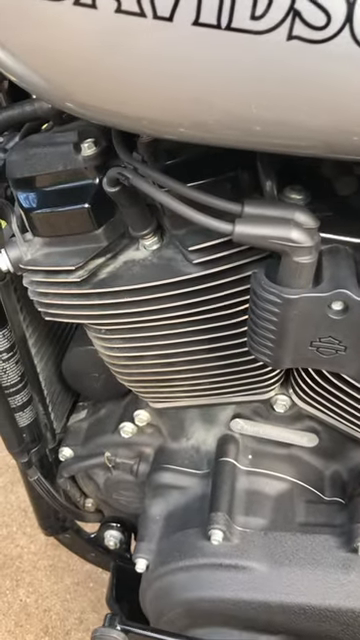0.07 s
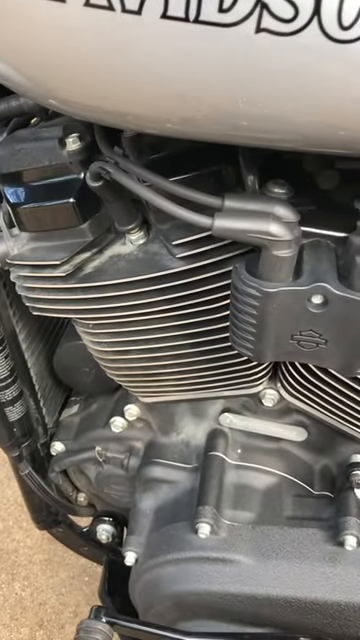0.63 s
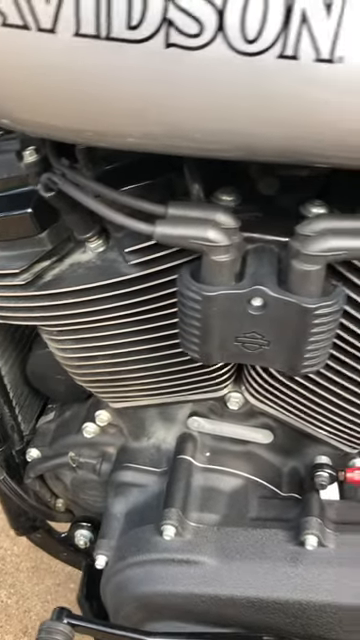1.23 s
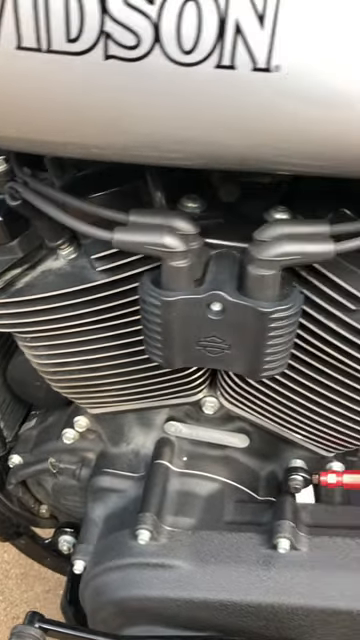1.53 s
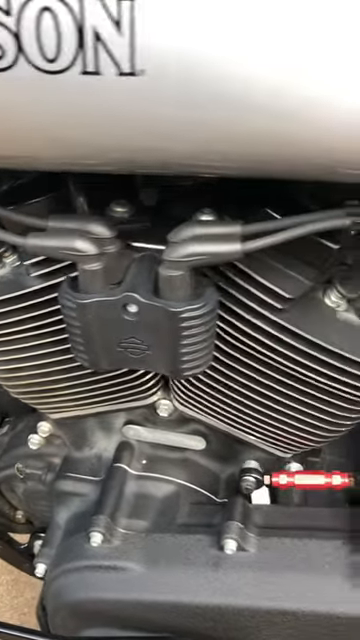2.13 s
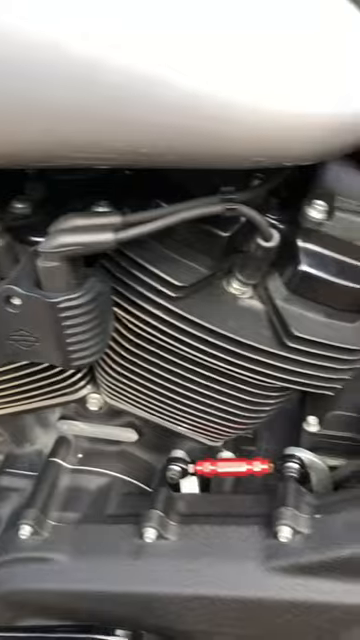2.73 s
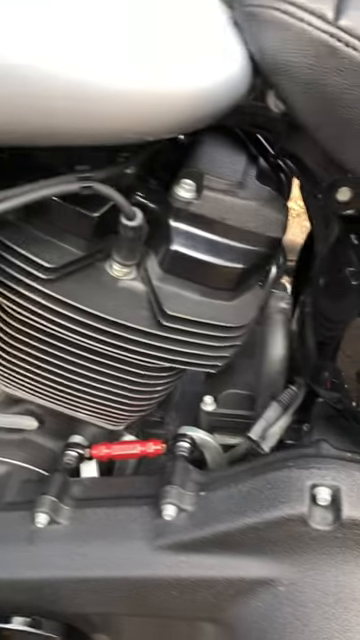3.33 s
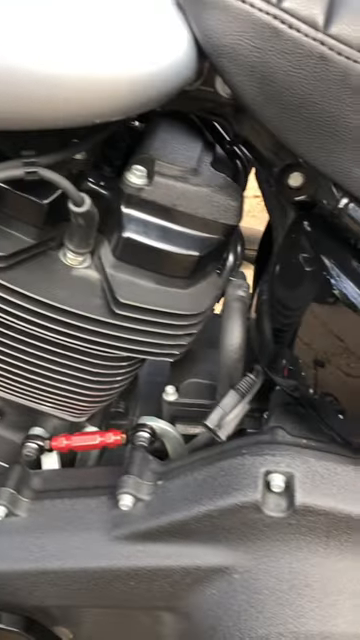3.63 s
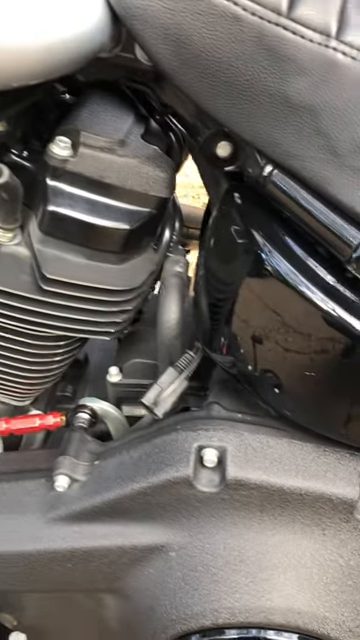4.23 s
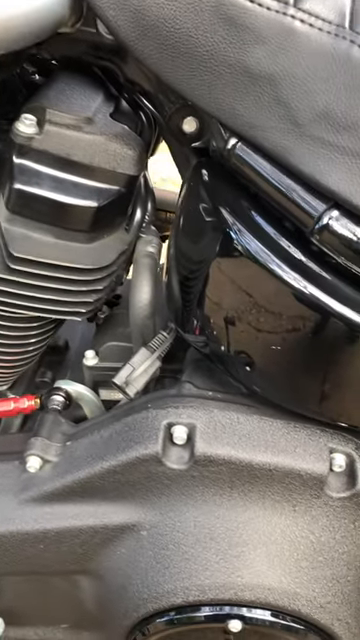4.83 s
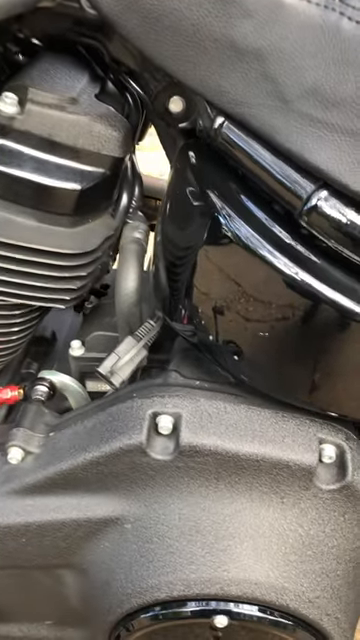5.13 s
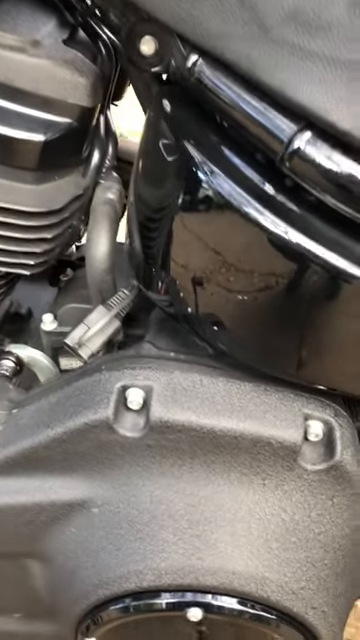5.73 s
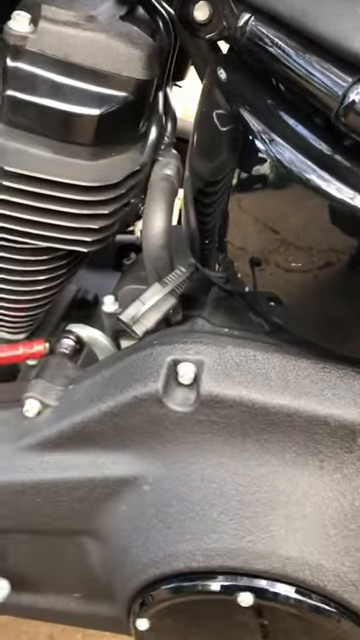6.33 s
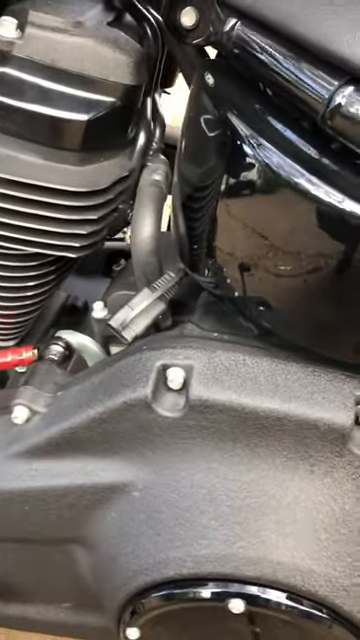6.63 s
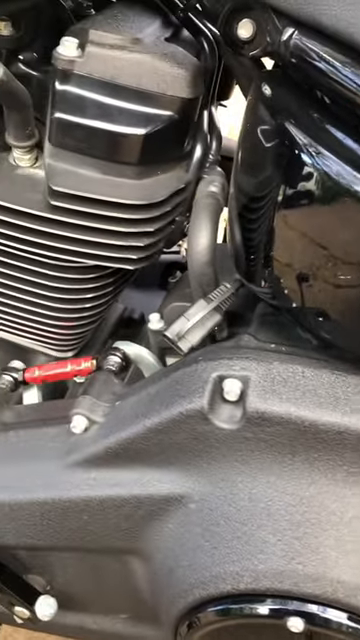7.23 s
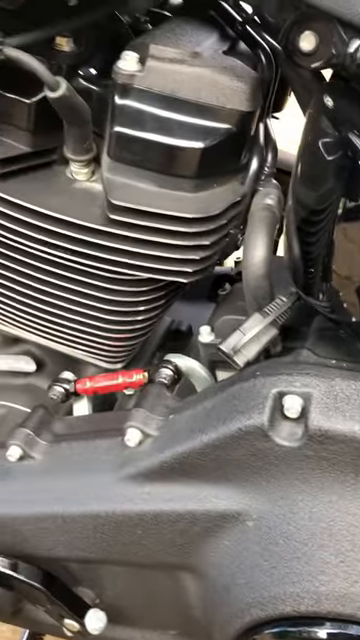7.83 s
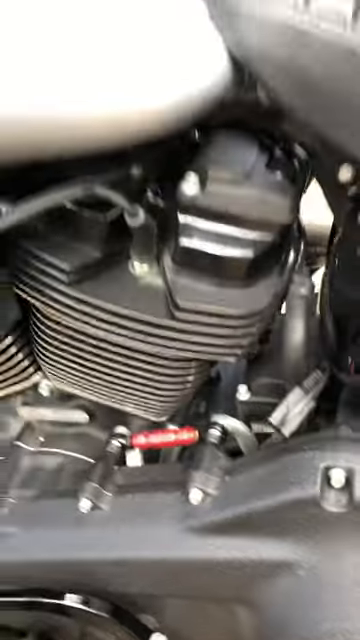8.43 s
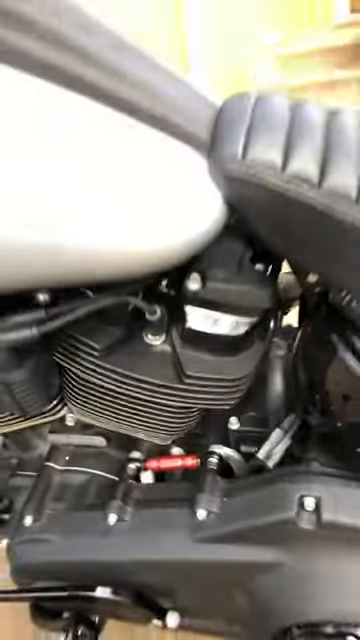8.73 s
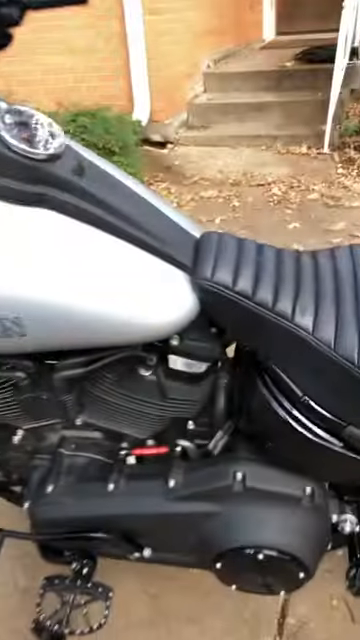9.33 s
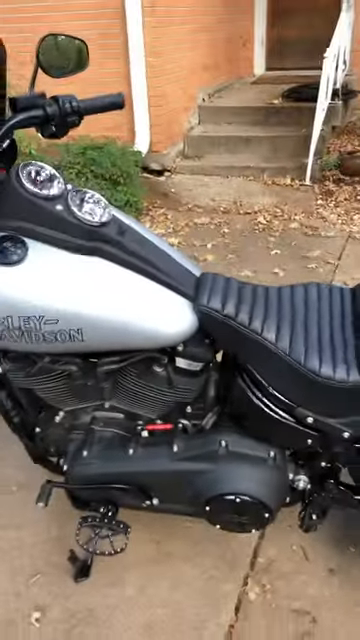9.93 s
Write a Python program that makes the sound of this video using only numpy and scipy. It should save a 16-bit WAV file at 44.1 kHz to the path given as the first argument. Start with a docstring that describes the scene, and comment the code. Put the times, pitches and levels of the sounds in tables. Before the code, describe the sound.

Heard from very close outdoors, a motorcycle engine idles throughout with a deep, loping rumble. Its valves tick fast and regularly, sometimes clacking harder, above rattling engine parts, a fine metallic sizzle and a light chain whirr. The tone shifts slightly as the microphone passes along the engine, and the ticking fades somewhat as it draws back at the end.

```python
"""A big air-cooled V-twin motorcycle idles outdoors, two unevenly spaced firings per cycle thumping
out of its exhaust. Pistons and chain rattle the crankcase, the valve gear ticks and the cooling fins
sizzle. The chain and gears of the primary drive whine, sagging in pitch at every compression stroke.
The microphone moves along the left side, from the front cylinder to the rear one, then backs away."""
import sys
import numpy as np
from scipy import signal
from scipy.fft import rfft, irfft, next_fast_len
from scipy.io import wavfile
from scipy.ndimage import map_coordinates

SR = 44100
rng = np.random.default_rng(int(sys.argv[2]) if len(sys.argv) > 2 else 0)


def output_pcm(signal):
    """Save a mono or channel-first signal as 16-bit PCM at the path in sys.argv[1].

    Samples are clipped to [-1, 1] before scaling.
    """
    pcm = np.clip(np.atleast_2d(signal).T, -1, 1) * 32767
    wavfile.write(sys.argv[1], SR, np.round(pcm).astype(np.int16))


N = 440118

# The idle wanders a little. Each row: time in seconds, four-stroke cycles per second.
IDLE_SPEED = [(0.0, 11.874), (2.1, 11.854), (2.8, 11.99), (3.2, 11.7), (3.4, 11.946), (3.8, 11.774),
              (4.6, 11.926), (4.9, 11.564), (5.4, 11.866), (6.3, 11.726), (7.0, 11.836), (7.3, 11.597),
              (7.5, 11.849), (7.8, 11.676), (8.8, 11.81), (9.0, 11.637), (9.4, 11.835), (10.0, 11.526)]
# Exhaust tones. Each row: multiple of the cycle rate, level in dB within its band.
EXHAUST_TONES = [(3, -44), (4, -18.5), (5, 1), (6, -13), (7, -9), (8, -16.5), (9, -21.5), (10, -17.0),
                 (11, -24.2), (12, -10.5), (13, -13.5), (14, -13), (15, -12.5), (16, -38), (17, -23),
                 (18, -25.5), (19, -41.5), (20, -27), (21, -43.5), (22, -37.5), (23, -36.5), (24, -30),
                 (25, -37), (26, -44), (27, -45), (28, -39.5), (29, -41), (30, -44), (31, -42.5),
                 (32, -51.3), (33, -59), (34, -50.4), (35, -42), (36, -44), (37, -49.1), (38, -41),
                 (39, -47.5), (40, -44)]
# Each row: place in the cycle from 0 to 1, strength.
FIRING_PUFFS = [(.427, 1), (.819, .73)]
# Exhaust pipe resonances. Each row: pitch in Hz, width in Hz.
PIPE_MODES = [(56.8, 14.4), (148.7, 11.8), (150, 100)]

# Blows in every cycle. Each row: place from 0 to 1, relative level in dB, rise time in seconds,
# seconds to fade by 60 dB.
ENGINE_KNOCKS = [(.29, 0.87, 0.0022, 0.076), (.52, -1.6, 0.002, 0.089), (.82, -1.9, 0.0023, 0.082)]
CHAIN_TUGS = [(0.51, 0.5, 0.0065, 0.059), (0.8, -1, 0.0077, 0.068), (0.96, -2.5, .006, 0.061),
              (0.2, -2.5, 0.005, 0.062), (0.64, -5, .006, 0.042)]
GEAR_PUSHES = [(.49, 0, .014, .095), (1.0, -.5, .014, .095), (.33, 1, .004, .04), (.83, -.5, .004, .04)]  # long after each firing, brief before it
TAPPET_TAPS = [(.784, -3, 0.0028, .042), (.865, -7.5, 0.0032, 0.035)]
ROCKER_TAPS = [(.365, 7.5, 0.0016, .08), (.41, 7, .002, 0.06), (.73, 7, 0.0018, 0.081),
               (.96, 4.5, 0.0022, .05)]
FIN_SHAKES = [(.355, 0, .0016, .05), (.43, -1, .002, .05), (.77, 2, .0018, .05), (.12, -6, .003, .05)]
VALVE_CLOSINGS = [(.12, 9.5, 0.0032, 0.055), (.235, -10, .003, 0.042), (.43, 7, .003, 0.039),
                  (.665, -12, 0.0017, 0.056), (.77, 9, .002, 0.054), (.86, 3, 0.0035, 0.064)]

# Tone colours of the parts. Each row: frequency in Hz, relative level in dB.
CASE_COLOUR = [(150, -23), (230, -5), (300, -5), (390, -7.5), (520, 1.5), (680, 1), (800, -1.5),
               (950, -8.5), (1300, -35)]
PISTON_COLOUR = [(700, -20), (900, -1), (1030, 2), (1180, -3.5), (1350, -1), (1500, -3.5), (1900, -32)]
COVER_COLOUR = [(1000, -32), (1450, -7.5), (1620, 4), (1800, -0.5), (1950, -0.5), (2170, -7.5),
                (2350, -1.5), (2600, -10.5), (3400, -36.5)]
CASE_FRONT_COLOUR = [(270, 1), (400, 0), (520, -12), (1150, -16), (1350, 1), (1450, 2), (1650, 1),
                     (1850, -14)]
TAPPET_COLOUR = [(800, -10), (1700, 6.5), (2200, 0.5), (3000, 4), (4000, 0.5), (5500, -0.5), (7000, -4.5),
                 (8000, -3.5), (8700, -9.5), (10000, -13), (13000, -22), (16000, -33)]
HEAD_COLOUR = [(1500, -11), (2400, 0), (2700, 1.5), (3050, 3.5), (3400, -1), (4200, -2.3), (4900, -6.5),
               (5800, -26), (8000, -35)]
SHIMMER_COLOUR = [(3800, -30), (5200, 3.5), (6100, -0.5), (6900, -2.5), (7400, -9), (7900, -3),
                  (8600, -13.5), (11000, -19)]
SIZZLE_COLOUR = [(4000, -14), (6500, -3.5), (7900, 4.5), (8500, 2.5), (9700, 5), (11500, -0.5), (13500, -5),
                 (15500, -11), (20000, -25)]

# Whining teeth. Each row: multiple of the cycle rate, relative level in dB, phase roughness in radians.
CHAIN_TONES = [(67.9, 0, 1.28)]
GEAR_TONES = [(168.4, -0.5, 0.33), (138.4, -6, 0.7)]
# The gear whine comes and goes. Each row: time in seconds, relative level in dB.
GEAR_LEVEL = [(0, -26), (1.8, -26.8), (2.4, -37), (3.6, -37), (4.3, -29), (6.2, -29.3), (8.3, -29),
              (8.8, -38), (9.98, -39)]
# Resonances of the drive and the cylinder head. Each row: pitch in Hz, width in Hz, weight in dB.
WHIRR_MODES = [(2370, 200, 0), (4280, 260, -6)]
HEAD_MODES = [(3070, 97, -1.5), (3940, 73, 2), (4310, 20, 9), (4670, 22, 10), (5240, 460, -10.5),
              (5890, 140, -8), (6370, 130, -6), (6710, 72, -1), (7300, 50, -4), (7760, 280, -7)]
# Spells when the loose tappet clacks. Each row: start and end in seconds, relative level in dB.
CLACK_SPELLS = [(0, .7, -24.5), (.7, 1.12, -28), (1.12, 1.72, -24.5), (1.8, 3.57, -24.7), (3.57, 4.24, -26),
                (4.24, 4.59, -24), (4.75, 5.36, -24), (5.44, 5.78, -27), (6.45, 6.72, -25.5),
                (7.04, 7.13, -29), (8.07, 8.49, -33), (8.49, 8.58, -27), (9.34, 9.43, -36),
                (9.6, 9.69, -35)]

# The microphone's path. Each row: time in seconds, metres along the engine, metres out from it.
MIC_PATH = [(0, 0, .3), (1.4, .1, .3), (3, .3, .3), (5, .47, .3), (6.5, .43, .3), (8.2, .37, .32),
            (8.65, .36, .45), (9.1, .35, .7), (9.98, .35, .92)]
# Where each sound comes from. Each entry: metres along the engine, gain in dB at NEAR_M,
# dB lost per doubling of distance, dB gained straight in front of it.
PART_PLACES = {"boom": (.38, -11.3, 2.3, 0), "bark": (.42, -18.2, 2.3, 0), "thud": (.25, -38.4, 6.1, 0),
               "case": (.44, -31.2, 4.3, 0), "cover": (.18, -29, 3.8, 0), "barrels": (.16, -31.2, 4.1, 2),
               "chain": (.38, -33.8, 4.1, 0), "whirr": (.35, -44.5, .5, 0), "front": (.08, -46, 6, 11.5),
               "box": (.25, -42, 5.5, 8.5), "head": (.28, -31.9, 5.3, 0), "tappet": (.3, -40, 6, 0),
               "fins": (.16, -38.8, 5.4, 3.5), "seats": (.2, -44.5, 4.7, 0)}

NEAR_M, BEAM_M = .3, .075  # BEAM_M is half the width of the zone in front of a part
SWELL_START_S, SWELL_END_S, SWELL_RAMP_S = .74, 3.06, .08  # the boom and the chain stand out here
SWELL_BOOM_DB, SWELL_CHAIN_DB = 1.6, 4
ECHO_S, ECHO_GAIN = .0073, .8  # the exhaust's reflection
START_PLACE, TOP_HZ = .04, 15750


def amp(db):
    """Turn decibels into a gain."""
    return 10 ** (np.asarray(db) / 20)


def unit(x):
    """Scale to an average (rms) level of 1."""
    return x / np.sqrt(np.mean(x ** 2) + 1e-20)


def curve(rows):
    """Join (seconds, value) points with straight lines, one value per sample."""
    return np.interp(np.arange(N) / SR, *np.transpose(rows))


def wobble(rate):
    """A smooth curve through `rate` random points a second."""
    coarse = np.arange(0, N + 16, 16)
    points = rng.standard_normal(int(N * rate / SR) + 4)
    return np.interp(np.arange(N), coarse, map_coordinates(points, [coarse * rate / SR]))


def spell(start, end, ramp_s):
    """1 from start to end, 0 outside, with straight ramps."""
    t = np.arange(N) / SR
    return np.clip(np.minimum(t - start, end - t) / ramp_s + .5, 0, 1)


def filtered(x, response):
    """Scale each frequency f in x by response(f)."""
    size = next_fast_len(N + 8192)
    return irfft(rfft(x, size) * response(np.fft.rfftfreq(size, 1 / SR)), size)[:N]


def resonance(f, hz, width):
    """How something that rings at hz responds to frequency f."""
    return 1j * f * width / (hz * hz - f * f + 1j * f * width)


def coloured(x, colour):
    """Give x a tone colour that falls steeply past its ends, at level 1."""
    hz, db = np.transpose(colour)

    def response(f):
        ends = (1 + (hz[0] / (f + 1)) ** 8) * (1 + (f / hz[-1]) ** 8)
        return amp(np.interp(np.log(f + 1), np.log(hz), db)) / np.sqrt(ends)
    return unit(filtered(x, response))


def ringing(x, ring_db, fins_db, fins_t60):
    """Let x ring the cylinder head and the countless close resonances of its fins."""
    t = np.arange(SR // 10) / SR
    fins = rng.standard_normal(len(t)) * np.exp(-np.log(1000) * t / fins_t60)
    x = x + amp(fins_db) * signal.fftconvolve(x, fins / np.linalg.norm(fins))[:N]
    head = lambda f: sum(amp(db / 2) * resonance(f, hz, width) for hz, width, db in HEAD_MODES)
    return filtered(x, lambda f: 1 + amp(ring_db) * head(f))


def grit(spread_db):
    """Noise of uneven strength, like countless tiny contacts."""
    return unit(rng.standard_normal(N) * amp(spread_db * wobble(700)))


def recurring(cycles, share):
    """Contact noise of which a share comes back alike in every cycle."""
    places = np.linspace(0, 1, 1024)
    alike = unit(np.interp(cycles % 1, places, rng.standard_normal(len(places))))
    return np.sqrt(share) * alike + np.sqrt(1 - share) * grit(spread_db=1.5)


def blows(cycles, table, scatter_db, jitter_s):
    """The loudness outline of blows that return every cycle, each a little different."""
    t = np.arange(SR // 10) / SR
    starts = np.arange(np.ceil(cycles[-1]))
    power = np.zeros(N)
    for place, db, rise, t60 in table:
        size, slip = rng.standard_normal((2, len(starts)))
        at = np.interp(starts + place, cycles, np.arange(N), left=-SR, right=2 * N)
        at += slip * jitter_s * SR
        heard = (at >= 0) & (at < N)
        hits = np.bincount(at[heard].astype(int), amp(db + scatter_db * size[heard]) ** 2, N)
        shape = (1 - np.exp(-t / rise)) * np.exp(-np.log(1000) * t / t60)
        power += signal.fftconvolve(hits, shape ** 2)[:N]
    return unit(np.sqrt(np.abs(power)))


def reach(part):
    """How strongly a part's sound reaches the moving microphone."""
    place, db, fade_db, facing_db = PART_PLACES[part]
    t = np.linspace(0, N / SR, 500)
    when, *path = np.transpose(MIC_PATH)
    along, out = (np.interp(t, when, metres) for metres in path)
    doublings = np.log2(np.hypot(along - place, out) / NEAR_M)
    facing = np.exp(-((along - place) / BEAM_M) ** 2)
    return np.interp(np.arange(N) / SR, t, amp(db - fade_db * doublings + facing_db * facing))


def exhaust(cycles, swell):
    """Two puffs a cycle ring the pipe: a low boom, a bark, and a higher thud off the crankcase."""
    places = np.linspace(0, 1, 2048)
    boom, bark, thud = np.zeros((3, len(places)))
    mean_speed = np.mean(np.array(IDLE_SPEED)[:, 1])
    for k, db in EXHAUST_TONES:
        hz = k * mean_speed
        # puffs, pipe and echo set only the phase (timing) of each tone
        puffs = sum(size * np.exp(-2j * np.pi * k * place) for place, size in FIRING_PUFFS)
        pipe = np.prod([resonance(hz, *mode) for mode in PIPE_MODES])
        echo = 1 + ECHO_GAIN * np.exp(-2j * np.pi * hz * ECHO_S)
        band = boom if hz < 100 else bark if hz < 260 else thud
        band += amp(db) * np.cos(2 * np.pi * k * places + np.angle(puffs * pipe * echo))
    boom, bark, thud = (unit(np.interp(cycles % 1, places, band)) for band in (boom, bark, thud))
    burn = wobble(22)  # no two charges burn quite alike
    return (reach("boom") * amp(SWELL_BOOM_DB * swell + .33 * burn) * boom
            + reach("bark") * amp(.31 * burn) * bark
            + reach("thud") * amp(1.2 * burn) * thud)


def gas_rumble(cycles):
    """Swirling gas follows each puff."""
    gas = grit(spread_db=1.5) * blows(cycles, ENGINE_KNOCKS, scatter_db=1, jitter_s=.00084)
    colour = [(28, -14), (42, -7), (65, -8), (100, -19), (155, -2.5), (205, -8.5), (300, -25.5)]
    return reach("bark") * amp(-12.5) * coloured(gas, colour)


def crankcase_clatter(cycles):
    """Pistons and chain rattle the crankcase, the cylinder barrels and the drive's cover."""
    knock = np.hypot(1, amp(-4.5) * blows(cycles, ENGINE_KNOCKS, scatter_db=1.5, jitter_s=.00072))
    case = reach("case") * coloured(recurring(cycles, share=.16) * knock, CASE_COLOUR)
    barrels = reach("barrels") * coloured(recurring(cycles, share=.094) * knock, PISTON_COLOUR)
    cover = reach("cover") * coloured(grit(spread_db=2), COVER_COLOUR)
    front = reach("front") * coloured(recurring(cycles, share=.16) * knock, CASE_FRONT_COLOUR)
    return case + barrels + cover + front


def meshing_teeth(cycles, tones, swing):
    """Teeth whine; twice a cycle the crank is kicked up to speed, then sags against compression."""
    stroke = 4 * np.pi * (cycles - .445)
    crank = cycles - swing * (np.cos(stroke) + .19 * np.cos(2 * stroke)) / (4 * np.pi)
    mesh = sum(amp(db) * np.sin(2 * np.pi * teeth * crank + rough * wobble(70))
               for teeth, db, rough in tones)
    return unit(mesh * amp(1.9 * wobble(70)))


def chain_whine(cycles, swell):
    """The chain sings each time it is tugged tight."""
    tugs = blows(cycles, CHAIN_TUGS, scatter_db=.5, jitter_s=.00069)
    whine = meshing_teeth(cycles, CHAIN_TONES, swing=.021)
    return reach("chain") * amp(SWELL_CHAIN_DB * swell) * tugs * whine


def gear_whine(cycles):
    """The gears sing each time their teeth take up the load."""
    load = blows(cycles, GEAR_PUSHES, scatter_db=.8, jitter_s=.0006)
    return amp(curve(GEAR_LEVEL) - 2.5) * load * meshing_teeth(cycles, GEAR_TONES, swing=.028)


def drive_whirr():
    """The primary drive's steady whirr, which carries far."""
    peaks = lambda f: sum(amp(db) * resonance(f, hz, width) ** 2 for hz, width, db in WHIRR_MODES)
    return reach("whirr") * unit(filtered(grit(spread_db=1), peaks))


def loose_tappet(cycles):
    """One tappet ticks with a boxy ring, and clacks in the spells when it has slack."""
    clacks = sum(amp(db) * spell(start, end, ramp_s=.01) for start, end, db in CLACK_SPELLS)
    tick_gain = amp(-7.9) * np.maximum(reach("tappet"), clacks)
    taps = blows(cycles, TAPPET_TAPS, scatter_db=.7, jitter_s=.00047)
    tick = ringing(grit(spread_db=2) * taps, ring_db=1, fins_db=-9.5, fins_t60=.092)
    box = unit(filtered(grit(spread_db=.5) * taps, lambda f: resonance(f, 1727, 110) ** 2))
    return tick_gain * coloured(tick, TAPPET_COLOUR) + reach("box") * box


def rockers(cycles):
    """The rockers, the levers that open the valves, tap softly and ring the head."""
    taps = np.hypot(amp(5.5), blows(cycles, ROCKER_TAPS, scatter_db=2.7, jitter_s=.0011))
    head = ringing(grit(spread_db=1.5) * taps, ring_db=-7, fins_db=-10, fins_t60=.1)
    return reach("head") * coloured(head, HEAD_COLOUR)


def cooling_fins(cycles):
    """Valve blows shake the fins into a shimmer, and closing valves make them sizzle."""
    shakes = np.hypot(amp(2), blows(cycles, FIN_SHAKES, scatter_db=2, jitter_s=.0008))
    closings = np.hypot(amp(-2), blows(cycles, VALVE_CLOSINGS, scatter_db=2, jitter_s=.00078))
    shimmer = ringing(grit(spread_db=2.5) * shakes, ring_db=-7, fins_db=-5, fins_t60=.072)
    sizzle = ringing(grit(spread_db=2.5) * closings, ring_db=-7, fins_db=-7, fins_t60=.082)
    return (reach("fins") * coloured(shimmer, SHIMMER_COLOUR)
            + reach("seats") * coloured(sizzle, SIZZLE_COLOUR))


def scene():
    """All parts sound together, timed by the one crankshaft."""
    cycles = START_PLACE + np.cumsum(curve(IDLE_SPEED)) / SR  # engine cycles so far
    swell = spell(SWELL_START_S, SWELL_END_S, SWELL_RAMP_S)
    engine = exhaust(cycles, swell) + gas_rumble(cycles) + crankcase_clatter(cycles)
    drive = chain_whine(cycles, swell) + gear_whine(cycles) + drive_whirr()
    valves = loose_tappet(cycles) + rockers(cycles) + cooling_fins(cycles)
    return (engine + drive + valves)[None]


def record(dry):
    """Cut away everything above TOP_HZ."""
    return filtered(dry[0], lambda f: f < TOP_HZ)[None]


dry = scene()
out = record(dry)
output_pcm(out)
```